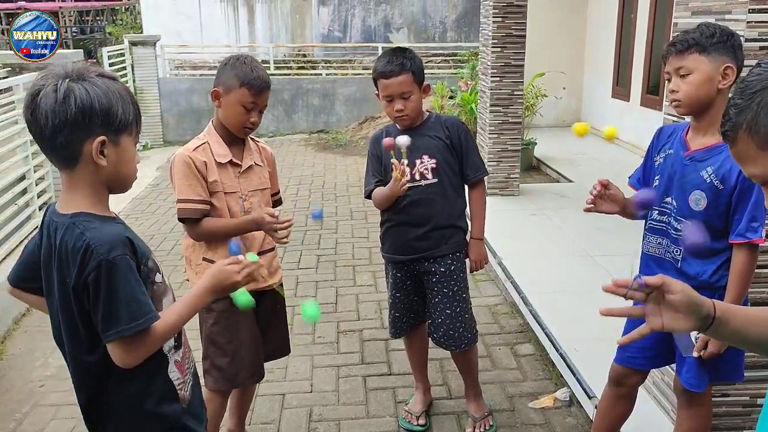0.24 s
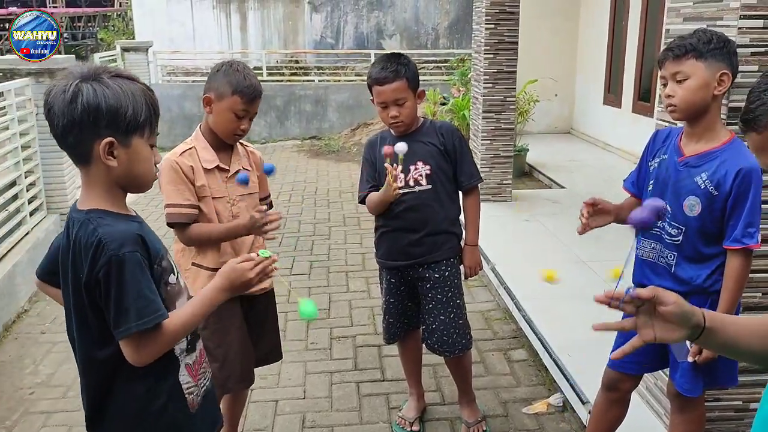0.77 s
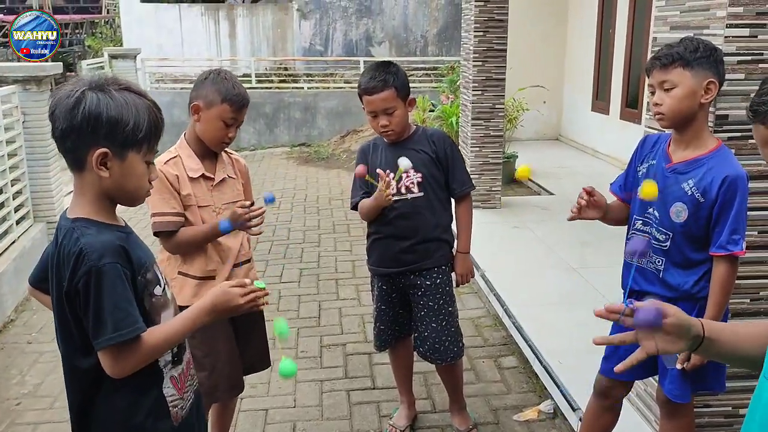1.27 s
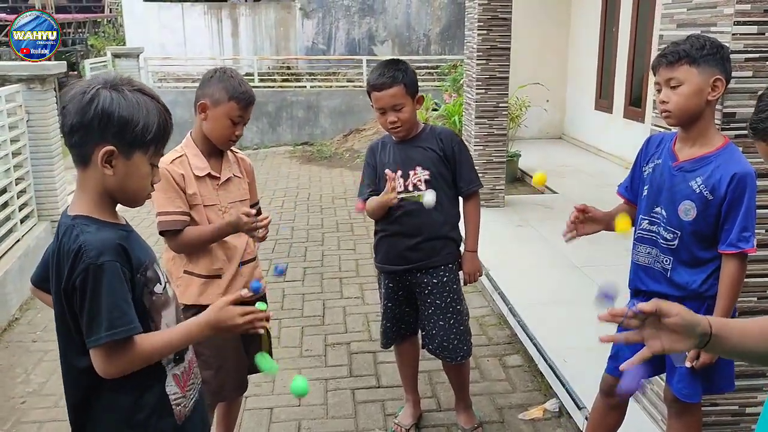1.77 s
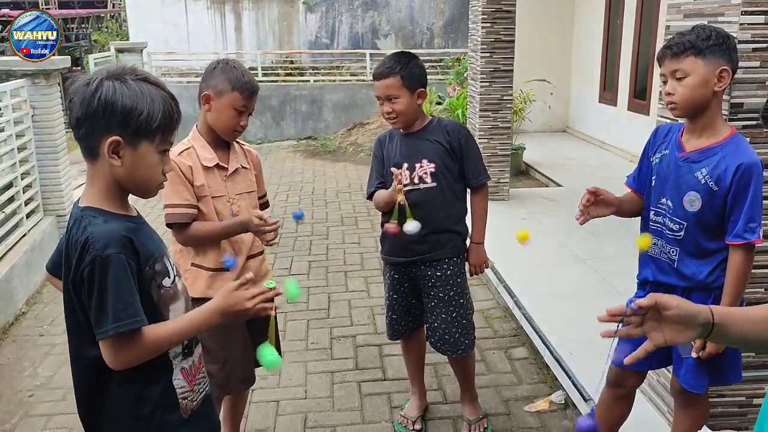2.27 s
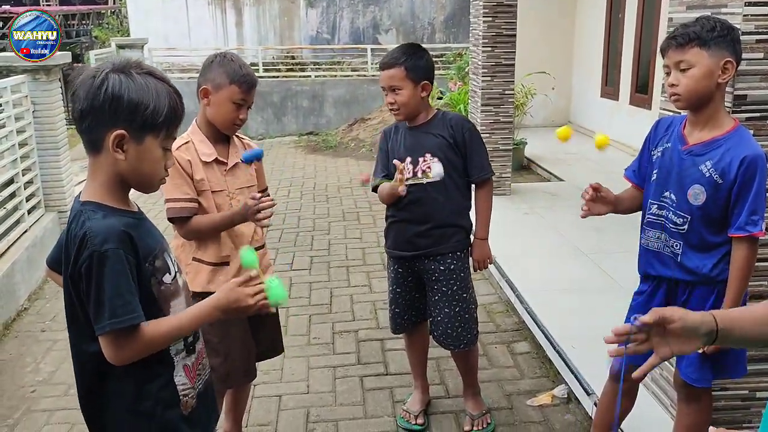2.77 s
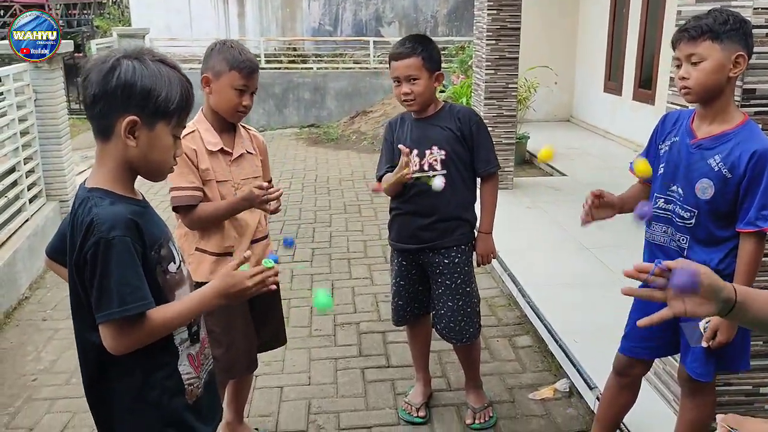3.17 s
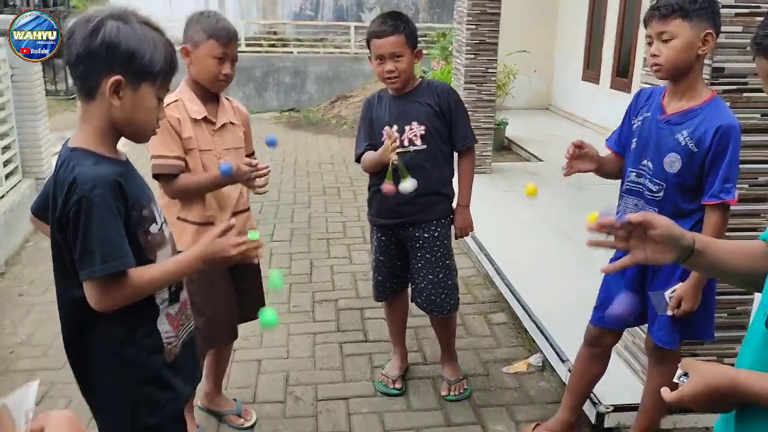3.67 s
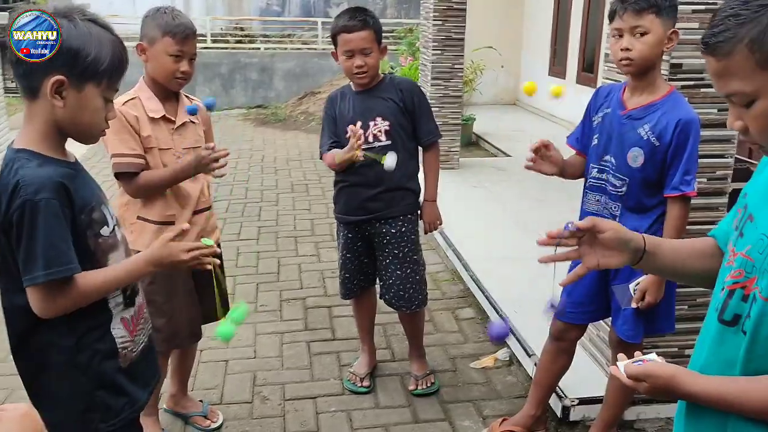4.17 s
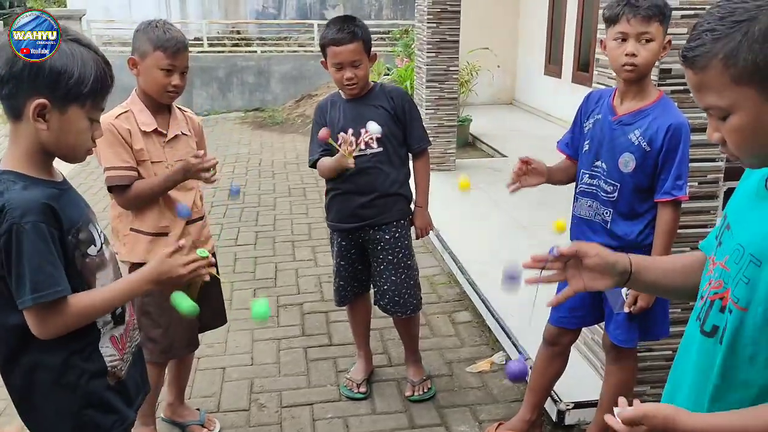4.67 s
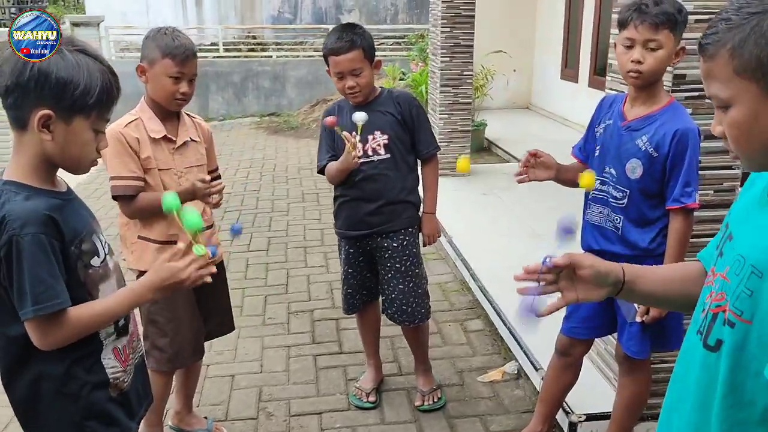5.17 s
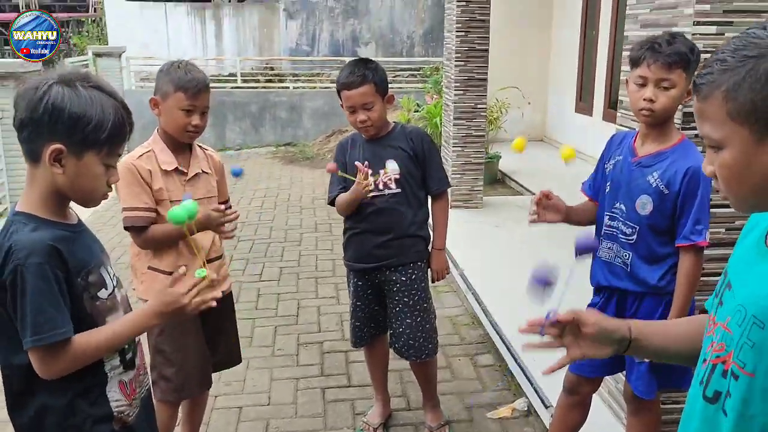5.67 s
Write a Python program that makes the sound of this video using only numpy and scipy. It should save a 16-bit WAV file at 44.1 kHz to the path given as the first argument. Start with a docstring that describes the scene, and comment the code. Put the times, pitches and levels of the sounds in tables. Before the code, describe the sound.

Sharp, bright plastic clacking from four swinging ball toys, dense and uneven together, echoing briefly off walls while a distant motor hums.

```python
"""Children swing four pairs of clackers in a paved yard: hard plastic balls on strings collide below and above the hand.
Each pair keeps its own nearly steady beat, five to eight clacks a second, so the rhythms slide through one another.
Each collision is one sharp pressure pulse, thrown back by the players' bodies, the paving and the house walls.
A small single-cylinder engine idles some way off: each puff of exhaust rings its pipe.
Near the microphone are soft thuds of swelling low noise and stick-slip creaks; faint noise makes the outdoor air."""
import sys
import numpy as np
from scipy import signal
from scipy.fft import rfft, irfft, next_fast_len
from scipy.io import wavfile
from scipy.ndimage import map_coordinates

SR = 44100
rng = np.random.default_rng(int(sys.argv[2]) if len(sys.argv) > 2 else 0)


def file_out(sig):
    """Save sig as 16-bit WAV at sys.argv[1]."""
    # one column per channel
    cols = np.atleast_2d(sig).T
    # limit, then scale
    lim = np.clip(cols, -1, 1)
    pcm = np.round(lim * 32767).astype(np.int16)
    wavfile.write(sys.argv[1], SR, pcm)


N = 261459


def amp(db):
    """Turn decibels into gain."""
    return 10 ** (np.asarray(db) / 20)


def unit(x):
    """Scale to rms 1."""
    return x / np.sqrt(np.mean(x ** 2) + 1e-20)


def along(points, hz):
    """Read a curve of (Hz, value) points on a log frequency axis."""
    f, value = np.transpose(points)
    return np.interp(np.log(hz + 1), np.log(f + 1), value)


def at_time(points, s):
    """Read a curve of (seconds, value) points at time s."""
    times, values = np.transpose(points)
    return np.interp(s, times, values)


def filtered(x, response):
    """Multiply the spectrum of x by a response that depends on frequency."""
    m = next_fast_len(N + SR // 2)
    hz = np.fft.rfftfreq(m, 1 / SR)
    return irfft(rfft(x, m) * response(hz), m)[..., :N]


def noise(spectrum, channels=2):
    """Make unrelated coloured noises with rms 1 overall."""
    white = rng.standard_normal((channels, N))
    return unit(filtered(white, lambda hz: amp(along(spectrum, hz))))


def add(track, s, sound):
    """Mix a sound into a track at time s."""
    start = max(round(s * SR), 0)
    part = track[..., start:start + sound.shape[-1]]
    part += sound[..., :part.shape[-1]]


def panned(pan_db):
    """Gains for left and right that differ by pan_db."""
    return amp(np.array([[pan_db], [-pan_db]]) / 2)


def pulse(gain_db):
    """Make the most compact causal (minimum-phase) pulse with this spectrum, of energy 1."""
    cepstrum = irfft(np.log(amp(gain_db)))
    half = len(cepstrum) // 2
    # folding the cepstrum forward in time leaves nothing before the start
    cepstrum[1:half] *= 2
    cepstrum[half + 1:] = 0
    shape = irfft(np.exp(rfft(cepstrum)))[:half]
    return shape / np.linalg.norm(shape)


def scatter(first, spread, count=14):
    """Stereo echoes of many small reflectors, thinning out with delay, of energy 1 a side."""
    paths = np.zeros((2, SR // 16))
    # both sides share the reflectors, with slightly different delays
    late = rng.exponential(spread, count) + rng.uniform(0, .0005, (2, count))
    places = np.clip(np.round((first + late) * SR).astype(int), 0, paths.shape[1] - 1)
    np.add.at(paths, (np.arange(2)[:, None], places), rng.standard_normal(count))
    return paths / np.linalg.norm(paths, axis=1, keepdims=True)


# Colour of the outdoor air. Each row: frequency in Hz, relative level in dB per Hz.
AIR_COLOUR = [(20, 0), (65, -4.5), (130, 6.5), (300, -9.5), (600, -13), (1500, -16.5), (5000, -77),
              (15000, -55)]


def air(shared_db=-55, apart_db=-59):
    """Faint outdoor rush: one noise common to both ports plus a separate noise in each."""
    return amp(shared_db) * noise(AIR_COLOUR, channels=1) + amp(apart_db) * noise(AIR_COLOUR)


# The idling engine. Each row: time in seconds, firings per second, level in dB before panning.
ENGINE_IDLE = [(0, 13.75, -47), (2.8, 13.8, -49.5), (3.4, 13.72, -49), (4.1, 13.55, -49.5),
               (5, 13.55, -46.5), (5.93, 13.6, -46)]
# Notes of the exhaust. Each row: frequency in Hz, relative level in dB, seconds to fade by 60 dB.
EXHAUST_NOTES = [(88, 1, 0.31), (94, 0, 0.39), (124.5, -1, 0.13), (156, -3, 0.16), (174.3, 0.5, 0.28),
                 (236.5, -14.5, 0.45)]


def engine(uneven_db=0.8, pan_db=5.0, first_turn=.6):
    """One puff per firing rings the exhaust; only the low notes carry this far."""
    t = np.arange(-SR, N) / SR  # it has been running for a while
    times, rates, levels = np.transpose(ENGINE_IDLE)
    turns = np.cumsum(np.interp(t, times, rates)) / SR
    # it fires at each whole count
    fired = np.flatnonzero(np.diff(np.floor(turns - turns[SR] + first_turn)))
    puffs = np.zeros(len(t))
    puffs[fired] = amp(uneven_db * rng.standard_normal(len(fired)))
    u = np.arange(SR // 2) / SR
    pipe = np.zeros(len(u))
    for k, (hz, db, t60) in enumerate(EXHAUST_NOTES):
        pipe += (-1) ** k * amp(db - 60 * u / t60) * np.sin(2 * np.pi * hz * u)
    hum = unit(signal.fftconvolve(puffs, pipe)[SR:SR + N])
    return hum * amp(np.interp(t[SR:], times, levels)) * panned(pan_db)


# Short low creaks. Each row: start in seconds, length in seconds, resonance in Hz at the start,
# resonance in Hz it sinks towards, level in dB.
CREAKS = [(3.27, 0.036, 328, 290, -48.5), (5.229, 0.033, 575.4, 550, -42.5), (5.262, 0.023, 400, 347, -42),
          (5.481, 0.038, 604, 324, -48)]


def creaks(slip_rate=120, jitter=0.079, t60=0.02):
    """A few stick-slip pulses ring one hollow resonance that sinks in pitch."""
    # slip_rate in slips per second, jitter as a share of the gap between slips, t60 in seconds
    out, t = np.zeros(N), np.arange(SR // 25) / SR
    for s, length, start_hz, end_hz, db in CREAKS:
        creak = np.zeros(SR // 8)
        for at in np.arange(0, length, 1 / slip_rate):
            hz = start_hz + (end_hz - start_hz) * at / length
            fade = amp(-60 * t / t60) * (1 - np.exp(-t / 0.0002))
            slip = at + jitter * rng.standard_normal() / slip_rate
            add(creak, slip, np.sin(2 * np.pi * hz * t) * fade)
        add(out, s, amp(db) * creak / np.linalg.norm(creak) * np.sqrt(length * SR))
    return out


# Soft low thuds. Each row: time of the peak in seconds, relative peak level in dB.
SOFT_THUDS = [(3.884, -32), (4.018, -35), (4.162, -34.5), (4.413, -35.5), (4.547, -31.5), (4.687, -23),
              (4.827, -30.5), (4.972, -32)]


def thuds(width=0.011, level_db=-8):
    """Each thud is a brief bell-shaped swell, width seconds wide, of dull low noise."""
    t = np.arange(N) / SR
    swell = sum(amp(db) * np.exp(-.5 * ((t - s) / width) ** 2) for s, db in SOFT_THUDS)
    dull = [(25, -18), (80, -7.0), (175, -2.5), (280, -21), (450, -25.5), (2000, -49)]  # Hz, relative dB
    return amp(level_db) * swell * noise(dull, channels=1)


# Colour of the yard's answer, shared by the light taps. Each row: frequency in Hz, relative level in dB.
YARD_COLOUR = [(400.0, -21.5), (800.0, -24), (1300.0, -13.5), (2200.0, -1), (3300.0, 3.5), (4400.0, 2.5),
               (5600.0, -4), (7000.0, -5), (8300.0, -30.5), (10000.0, -38), (12500.0, -29.5),
               (15000.0, -48)]


def yard(hits, level_db=-3, t60=0.69, build=0.00077, ringing_db=-37):
    """Every clack feeds a diffuse field between the walls, which swells briefly and dies away."""
    # t60: seconds to fade by 60 dB; build: seconds to swell; ringing_db is relative to level_db
    t, fed = np.arange(SR) / SR, np.zeros(N)
    for s, _, blow_db, _, _ in hits:
        add(fed, s, np.array([amp(blow_db) ** 2]))
    fade = amp(-60 * t / t60)
    decay = (fade * (1 - np.exp(-t / build))) ** 2
    power = np.abs(signal.fftconvolve(fed, decay / decay.sum())[:N])
    # the play is already under way, so the yard is ringing from the start
    add(power, 0, (amp(ringing_db) * fade) ** 2)
    # with no roof the echoes are sparse and arrive in clumps
    clumps = map_coordinates(rng.standard_normal(N // 16), [np.arange(N) * 200 / SR])
    return amp(level_db) * np.sqrt(power) * unit(amp(2 * clumps)) * noise(YARD_COLOUR)


def light_taps(softest_db=-25, loudest_db=-19, count=14, size=512):
    """Faint glancing touches fall at random times: each is one pulse with scattered echoes."""
    out = np.zeros((2, N))
    click = pulse(along(YARD_COLOUR, np.fft.rfftfreq(size, 1 / SR)))
    for place, strength in rng.uniform(size=(count, 2)):
        paths = scatter(first=0, spread=0.00082)
        tap = signal.fftconvolve(paths, click[None], axes=1)
        tap_db = softest_db + (loudest_db - softest_db) * strength
        add(out, place * N / SR, amp(tap_db) * tap)
    return out


# Each pair's swing, with an even beat between points. Each row: time in seconds, clacks so far.
SWINGS = [[(.0195, 0), (.533, 4), (.6684, 5), (.9299, 7), (1.7297, 13), (1.8599, 14), (2.128, 16),
           (2.5382, 19), (2.9525, 22), (3.3663, 25), (3.4938, 26), (3.627, 27), (3.8999, 29), (4.2979, 32),
           (4.8497, 36), (4.9804, 37), (5.5232, 41), (5.7855, 43), (5.9263, 44)], [(.099, 0), (.4843, 3), (.6186, 4), (.876, 6), (1.1454, 8), (1.4034, 10),
                              (1.6785, 12), (1.8139, 13), (2.723, 20), (2.8575, 21), (2.9899, 22),
                              (3.4006, 25), (3.7938, 28), (4.0665, 30), (4.3298, 32), (4.5874, 34),
                              (4.8529, 36), (5.1284, 38), (5.277, 39), (5.5611, 41), (5.8225, 43)], [(.1598, 0), (.4466, 2), (.8981, 5), (1.4877, 9),
                                                   (1.9098, 12), (2.2, 14), (2.332, 15), (3.0603, 20),
                                                   (3.479, 23), (3.8956, 26), (4.179, 28), (4.473, 30),
                                                   (4.7797, 32), (5.2053, 35), (5.3398, 36), (5.776, 39),
                                                   (5.916, 40)], [(.2025, 0), (.77, 3), (1.1146, 5),
                                                                       (1.3067, 6), (1.6556, 8),
                                                                       (2.0168, 10), (2.554, 13),
                                                                       (3.0835, 16), (3.7821, 20),
                                                                       (3.9776, 21), (4.1432, 22),
                                                                       (4.3262, 23), (4.4975, 24),
                                                                       (4.6887, 25), (4.8682, 26),
                                                                       (5.24, 28), (5.6007, 30)]]
# How hard each pair is swung, in the same order. Each row: time in seconds, relative blow in dB.
FORCES = [[(0, 3.5), (1.3, 5), (2.2, 3.5), (3, 5), (4.4, 5.5), (4.9, 5), (5.9, 6.5)], [(0, 3.8), (1.1, 2.55), (1.9, 3.5), (3.2, 2.6), (4.4, 2.5), (5.901, 3.4)], [(0, -4), (1.4, -6), (2.5, -3), (3.5, -1), (4.7, -2.5),
                                                     (5.9, 0.5)], [(0.2, -0.5), (1, -11.5),
                                                                          (1.7, 1.5), (2.3, -10),
                                                                          (3.1, -10), (3.9, -6.5), (4.2, 3),
                                                                          (5.6, 0)]]
# One row for each pair: limp in seconds (clacks come early and late by turns),
# random unevenness of the blows in dB, share of the hollow ring.
PLAYER_HABITS = [(.0012, 1, 1.0), (0.0017, 1.9, 0.28), (0.0018, 1.54, 0.33), (0.0015, 2.8, 0.12)]
# The two directions each pair's alternate clacks come from; only the near lead pair's two differ.
# Each row: direction number of the even clacks, direction number of the odd clacks.
CLACK_DIRECTIONS = [(0, 1), (2, 2), (3, 3), (4, 4)]
# Height of a hollow ring that comes and goes. Each row: time in seconds, height in dB before each pair's share.
HOLLOW_RING = [(0, -1), (2.6, -1.5), (3.6, 0), (4.5, 7), (5.2, 2.5), (5.9, 1.5)]
BRIGHT_PER_DB, BRIGHT_SCATTER_DB = 0.2855, 1.13  # dB per octave: gained per dB of blow, and by chance


def clacks():
    """List every collision on its pair's beat: harder blows are shorter and so brighter."""
    # each hit: seconds, direction, blow dB, brightness dB per octave, hollow ring dB
    hits = []
    for swing, force, habits, directions in zip(SWINGS, FORCES, PLAYER_HABITS, CLACK_DIRECTIONS):
        limp, uneven_db, ring_share = habits
        times, counts = np.transpose(swing)
        chances = rng.standard_normal(size=(int(counts[-1]) + 1, 2))
        for k, (aim, contact) in enumerate(chances):
            s = np.interp(k, counts, times) - limp * (-1) ** k
            blow_db = at_time(force, s) + uneven_db * aim
            bright_db = BRIGHT_PER_DB * blow_db + BRIGHT_SCATTER_DB * contact
            ring_db = ring_share * at_time(HOLLOW_RING, s)
            hits.append((s, directions[k % 2], blow_db, bright_db, ring_db))
    return hits


# Colour of a clack. Each row: frequency in Hz, then relative level in dB for each of directions 0 to 4.
CLACK_COLOUR = [(99, -6.5, -19, -34, -37, -31), (440, -19.5, -43, -35.5, -26, -35),
                (774, -23, -22.5, -20.5, -25.5, -31.5), (1367, -10.5, -11, -11.5, -11.5, -18.5),
                (1980, 0.5, -2.5, 0, -2, -3.5), (3200, 4, 7, -1, 1, 5), (3985, 2.5, 4.5, 5.5, 7, 2),
                (5590, -3, -4.5, -2.5, -1, -2.5), (7206, -2, -14.5, -7, -3.5, 6),
                (8020, -14.5, -20.5, -21.5, -21.5, -11.5), (10120, -45.5, -34, -40, -37, -46),
                (12330, -21, -31.5, -24, -20.5, -13), (14900, -45, -43, -45, -49, -51)]
# Each row is a direction: right port's lag in seconds, left minus right level in dB, body echo delay in
# seconds, wall echo delay in seconds, wall echo in dB, near echoes in dB, both relative to the direct blow.
ARRIVALS = [(.00022, 2, 0.001312, 0.038, -14, -2.5), (.00017, 3, .001277, 0.055, -34, -2.5),
            (.00036, 2.5, .0015, 0.083, -24, -4), (.00036, 3, .0015, 0.073, -16, -1),
            (.0002, 3, 0.0012, 0.062, -11, -3.5)]
CENTRE_HZ, RING_OCTAVES = 3950, 0.41  # centre and width of the hollow ring
TURNING_DB = 2  # the balls turn on their strings, so each clack's colour differs by chance


def clackers(hits, level_db=2, paving_db=-13, shift=0.081, moving=0.52, size=512):
    """Each collision is one pulse, reaching the ports directly and by way of bodies, paving and a wall."""
    # moving: share of the near scattered echoes' energy that is new each time; shift: change in body delay
    out, hz = np.zeros((2, N)), np.fft.rfftfreq(size, 1 / SR)
    octaves = np.log2(np.clip(hz, 1000, 9000) / CENTRE_HZ)
    hollow = np.exp(-(octaves / RING_OCTAVES) ** 2) - .5
    # the players stand still, so part of each direction's near echoes stays the same
    standing = [scatter(first=0.0022, spread=.0016) for _ in ARRIVALS]
    for s, which, blow_db, bright_db, ring_db in hits:
        lag, pan_db, body_delay, wall_delay, wall_db, near_db = ARRIVALS[which]
        colour = np.array(CLACK_COLOUR)[:, [0, which + 1]]
        colour[:, 1] += TURNING_DB * rng.standard_normal(len(colour))
        click = pulse(along(colour, hz) + bright_db * octaves + ring_db * hollow)
        fresh = scatter(first=.0009, spread=0.0019)
        near = np.sqrt(1 - moving) * standing[which] + np.sqrt(moving) * fresh
        # half of the near echoes' energy comes off the player's body
        echo = amp(near_db) / np.sqrt(2)
        paths = echo * near
        paths += amp(paving_db) * scatter(first=.007, spread=.005)
        paths += amp(wall_db) * scatter(first=wall_delay, spread=0.001)
        bounce = body_delay * (1 + shift * rng.uniform(-1.2, 1))
        for side, delay in enumerate([0, lag]):
            paths[side, round(delay * SR)] += 1
            paths[side, round((delay + bounce) * SR)] += echo
        sound = signal.fftconvolve(paths, click[None], axes=1)
        add(out, s - lag / 2, amp(level_db + blow_db) * panned(pan_db) * sound)
    return out


# Narrow peaks and dips shared by all the play. Each row: centre in Hz, width in Hz, height in dB.
SHARED_PEAKS = [(967, 167, 6.5), (1184, 77, -2.5), (1554, 144, 1.5), (1684, 46, -4), (3956, 85, -0.5),
                (5430, 200, 1.5), (8680, 270, 4), (13600, 570, 6), (16000, 450, -4)]
# The two microphone ports differ in colour. Each row: frequency in Hz, left minus right level in dB.
PORT_COLOUR = [(500, 2), (1200, 0), (2200, -0.5), (3300, -4), (4500, -6.5), (6000, -6.5), (8000, 0),
               (12500, -2.5)]
# They also differ in phase. Each row: frequency in Hz, radians by which left leads.
PORT_LEAD = [(100, 0.5), (300, -.5), (600, -0.6), (1000, -1.6), (1700, -1.5), (2400, 0.5), (15000, 0)]


def through_ports(play):
    """Colour the play with shared peaks, then split the ports' level and phase differences evenly."""
    hz = np.fft.rfftfreq(SR // 10, 1 / SR)
    peaks_db = sum(db * np.exp(-.5 * ((hz - centre) / width) ** 2) for centre, width, db in SHARED_PEAKS)
    play = signal.fftconvolve(play, pulse(peaks_db)[None], axes=1)[:, :N]
    sides = np.array([[.5], [-.5]])

    def ports(hz):
        return amp(along(PORT_COLOUR, hz) * sides) * np.exp(1j * along(PORT_LEAD, hz) * sides)

    return filtered(play, ports)


def scene():
    """The clackers and their yard over the engine, thuds, creaks and air."""
    hits = clacks()
    play = through_ports(clackers(hits) + light_taps() + yard(hits))
    return play + engine() + thuds() + creaks() + air()


TOP_HZ = 16000  # the recorder's band limit


def record(dry):
    """The sharpest clacks clip at the recorder's ceiling; nothing is kept above its band limit."""
    clipped = np.clip(dry, -.92, .92)
    return filtered(clipped, lambda hz: hz < TOP_HZ)


dry = scene()
out = record(dry)
file_out(out)
```